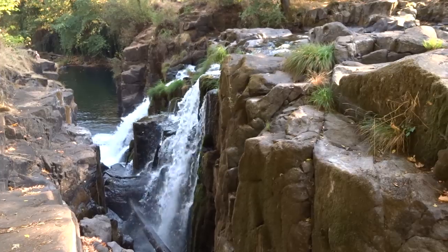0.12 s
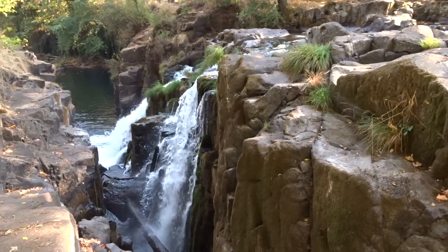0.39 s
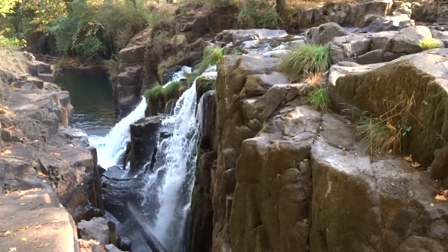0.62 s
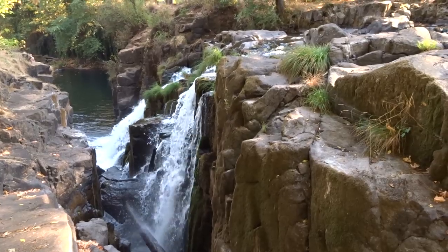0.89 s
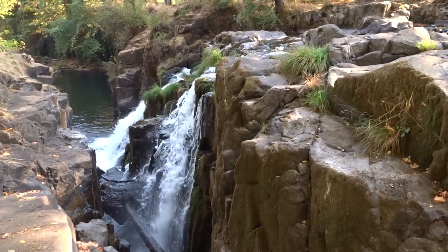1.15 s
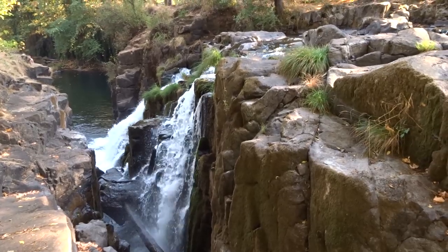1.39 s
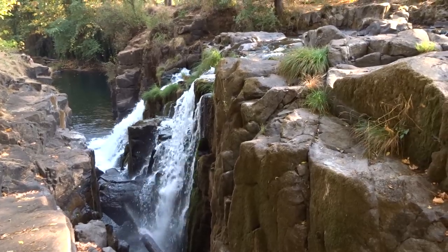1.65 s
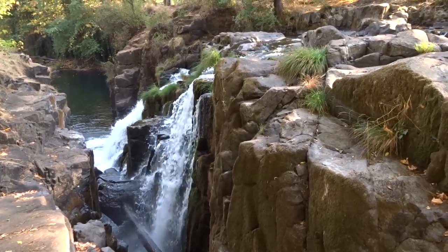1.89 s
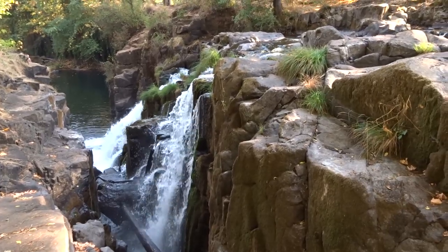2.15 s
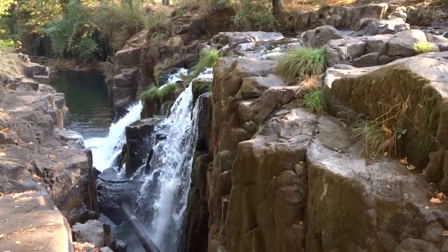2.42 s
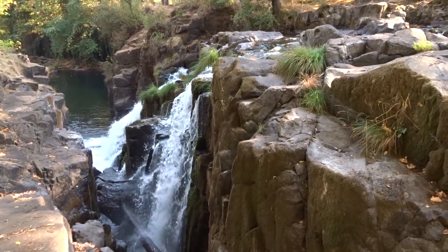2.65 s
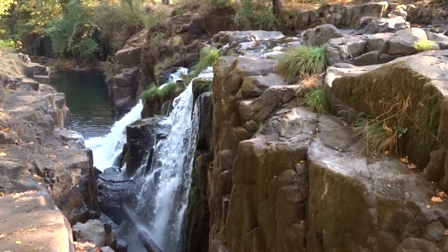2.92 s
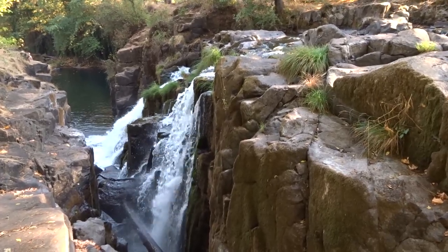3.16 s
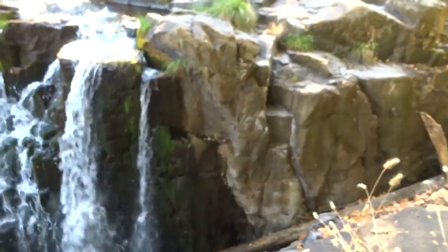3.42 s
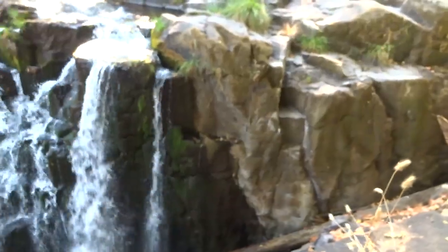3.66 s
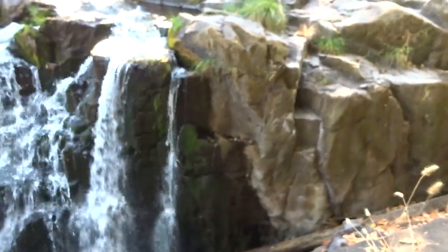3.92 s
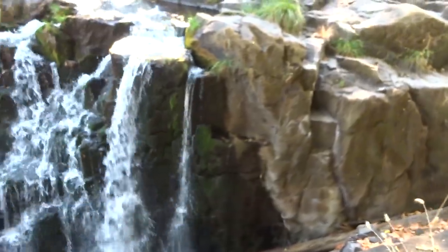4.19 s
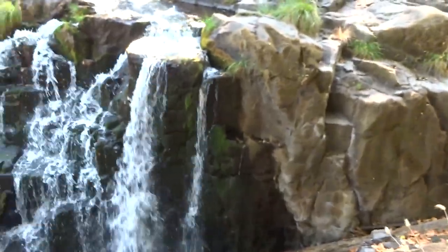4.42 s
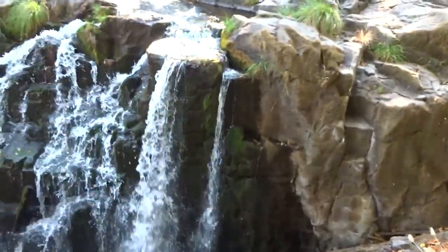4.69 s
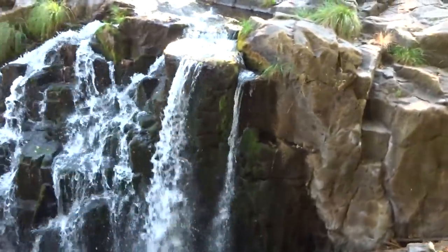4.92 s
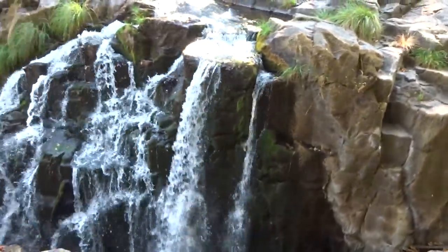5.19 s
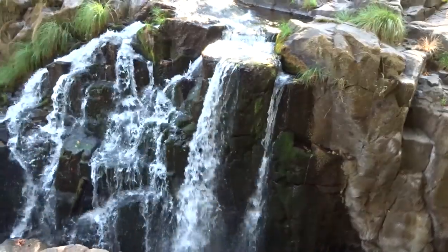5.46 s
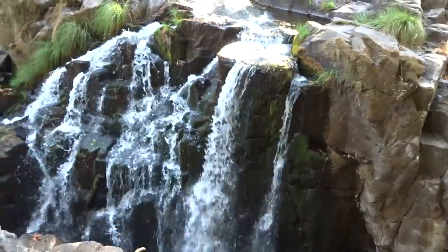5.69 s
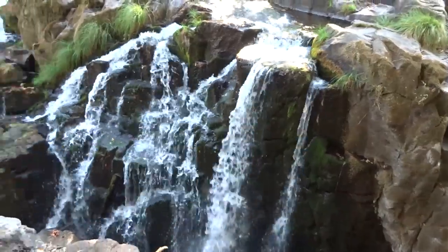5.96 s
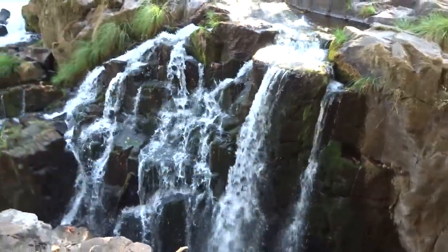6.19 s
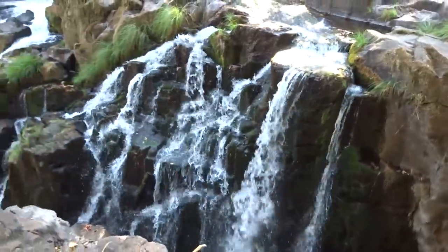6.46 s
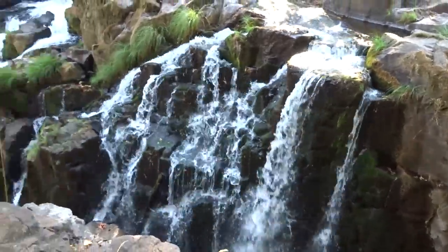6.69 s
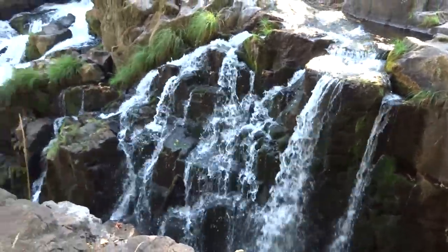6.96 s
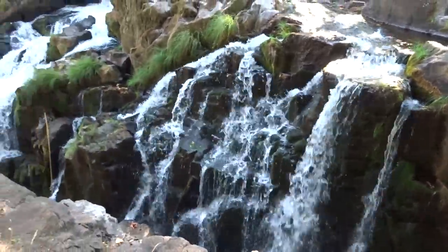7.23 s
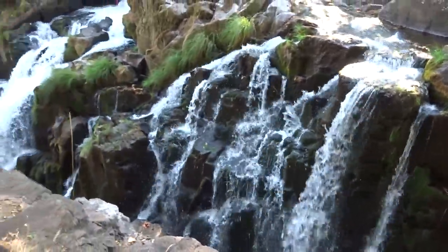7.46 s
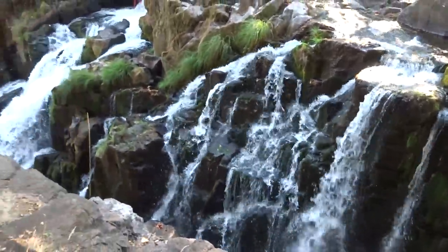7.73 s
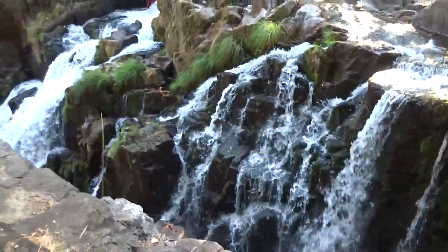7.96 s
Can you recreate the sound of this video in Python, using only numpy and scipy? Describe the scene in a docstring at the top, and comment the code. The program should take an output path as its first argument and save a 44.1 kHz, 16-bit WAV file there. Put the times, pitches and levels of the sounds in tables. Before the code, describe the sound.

A loud, dense, steady waterfall rush over rock with faint low wind rumble, briefly cut near three seconds, then fading back in slightly changed.

```python
"""A rocky gorge with a waterfall, heard from above the fall and then facing it. Countless drops merge into one
broad rush: dense random impacts, filtered by water and rock, swelling in bands. A light breeze rumbles on the
two microphone ports: low-passing gusts of lumpy low noise. At the change of standpoint the sound is cut off,
then fades in again; the image is wide, and narrows as the microphone turns along the fall. Now and then a
treble band flares wide for an instant."""
import sys
import numpy as np
from scipy import signal
from scipy.fft import rfft, irfft
from scipy.io import wavfile

SR = 44100
rng = np.random.default_rng(int(sys.argv[2]) if len(sys.argv) > 2 else 0)


def digitize_waveform(pressure):
    """Quantize a signal to 16-bit integers and store it at the path in sys.argv[1].

    Rows of a 2-D input are taken as channels; values are limited to [-1, 1].
    """
    field = np.atleast_2d(pressure).T
    bounded = np.clip(field, -1, 1)
    quanta = np.round(bounded * 32767).astype(np.int16)
    wavfile.write(sys.argv[1], SR, quanta)


def volts_from_db(level):
    """Convert decibel levels to linear amplitude ratios."""
    exponent = np.asarray(level, float) / 20
    return 10 ** exponent


N = 357210
TIME_S = np.arange(N) / SR
HZ = np.maximum(np.fft.rfftfreq(N, 1 / SR), 1)   # kept off zero for the log axis

FACING_START_S = 3.2853                  # the second standpoint begins here
TURN_START_S, TURN_END_S = 3, 5.5        # the microphone turns along the fall
ABOVE = TIME_S < FACING_START_S          # true while we stand above the fall


def rms_one(x):
    """Scale to unit rms."""
    return x / np.sqrt(np.mean(x ** 2) + 1e-20)


def curve_db(points):
    """Read a (Hz, dB) curve at every frequency bin, on a log-frequency axis."""
    hz, db = np.transpose(points)
    return np.interp(np.log(HZ), np.log(hz), db)


def coloured(source, spectrum_db):
    """Filter a source by a dB value per frequency bin."""
    return irfft(rfft(source) * volts_from_db(spectrum_db), N)


def drift(rate_hz):
    """Slow chance: noise at every 40th sample, low-passed twice at rate_hz, with spread 1."""
    pole = np.exp(-80 * np.pi * rate_hz / SR)
    noise = rng.standard_normal(N // 40 + 4002)
    slow = signal.lfilter([1], [1, -2 * pole, pole * pole], noise)[4000:]   # skip the filter's start
    return np.interp(np.arange(N) / 40, np.arange(len(slow)), rms_one(slow - slow.mean()))


def by_standpoint(above, facing, turned):
    """One value above the fall; facing it, a value that slides to another as the microphone turns."""
    return np.where(ABOVE, above, np.interp(TIME_S, [TURN_START_S, TURN_END_S], [facing, turned]))


def breeze():
    """Turbulence at each port: lumpy low noise, mostly its own per channel, its deepest part cut by the mic."""
    # Gusts on the ports. Each row: start in seconds, length in seconds, level in dB before the lumps.
    gusts = [(0, .36, -42.5), (.7, .25, -49), (1.1, 0.58, -52), (1.718, .9, -46), (2.616, 0.7, -43),
             (4.79, .12, -53), (6.27, .2, -52), (6.7, 0.4, -58), (7.36, .16, -46)]
    edge_s, calm_db, lump_db = .04, -80, 6   # swell and decay time, air between gusts, spread of the lumps
    band = signal.butter(2, [87, 345], "band", fs=SR, output="sos")
    bass_cut = signal.butter(2, 110, "high", fs=SR, output="sos")
    noise = rng.standard_normal((2, N)) + .5 * rng.standard_normal(N)   # own part plus common part
    eddies = rms_one(signal.sosfilt(np.vstack([band, bass_cut]), noise))
    wind = np.full(N, volts_from_db(calm_db))
    for start_s, length_s, db in gusts:
        inside_s = np.minimum(TIME_S - start_s, start_s + length_s - TIME_S)
        wind += volts_from_db(db) * np.clip(inside_s / edge_s + .5, 0, 1)
    lumps_db = lump_db * np.array([drift(24), drift(14)])
    return eddies * wind * volts_from_db(lumps_db)


def impacts(size_spread_db, clump_db):
    """A drop lands at every instant; sizes vary, and heavier sheets of water arrive in clumps."""
    sizes_db = size_spread_db * np.minimum(rng.exponential(1, N), 5) + clump_db * drift(67)
    return rng.standard_normal(N) * volts_from_db(sizes_db)


def falling_water():
    """Impacts coloured by water and rock: the sound both ports share, and what differs between them."""
    # Falling water as the microphone hears it, thin in the bass.
    # Each row: frequency in Hz, relative spectral density in dB.
    water = [(15, -45), (30, -32), (60, -22.5), (150, -13), (300, -3.5), (600, 0.5), (5000, -1), (7900, -2),
             (8800, -4), (12500, -4.5), (14200, -6.5), (15500, -9.5)]
    # Rock faces and the ledge underfoot colour the low and middle rush, from above the fall and facing it.
    # Each row: frequency in Hz, gain in dB.
    rock_above = [(30, 2), (100, 1.5), (200, 2), (310, 3), (400, -2.5), (470, -7), (620, 0.5), (880, 1.5),
                  (1000, -0.5), (1400, -1), (1700, -1), (2100, -1.5), (3600, 1), (6200, -1)]
    rock_facing = [(60, -3.5), (100, -4), (150, -1), (230, 1.5), (340, 2), (450, -1.5), (540, -0.5),
                   (720, 2), (1000, 1), (1200, 2), (1500, -0.5), (1850, 1.5), (3600, -1), (6200, 0)]
    # Change of colour once the microphone has turned along the fall. Each row: frequency in Hz, gain in dB.
    turned = [(100, -1.5), (250, -0.5), (450, -3.5), (700, -1.5), (1200, -1), (2000, -2), (3500, 1.5),
              (6000, -0.5), (10000, -1)]
    # Colour of the difference between the ports, at each standpoint, before the image is widened or narrowed.
    # Each row: frequency in Hz, gain in dB on top of the shared colour.
    difference_above = [(100, -30), (400, -21), (700, -24), (1300, -18.5), (2500, -27), (3400, -34),
                        (5000, -19.5), (9000, -30.5), (15000, -67)]
    difference_facing = [(100, -57), (400, -18), (700, -21.5), (1300, -12.5), (2500, -22), (3400, -20.5),
                         (5000, -14.5), (9000, -30), (15000, -60)]

    above_db = curve_db(water) + curve_db(rock_above)
    facing_db = curve_db(water) + curve_db(rock_facing)
    common_drops = impacts(size_spread_db=1.0, clump_db=0.18)
    separate_drops = impacts(size_spread_db=1.0, clump_db=0.2)

    turn = np.interp(TIME_S, [TURN_START_S, TURN_END_S], [0, 1])
    facing = (1 - turn) * coloured(common_drops, facing_db)
    facing += turn * coloured(common_drops, facing_db + curve_db(turned))
    shared = np.where(ABOVE, coloured(common_drops, above_db), facing)
    apart = np.where(ABOVE,
                     coloured(separate_drops, above_db + curve_db(difference_above)),
                     coloured(separate_drops, facing_db + curve_db(difference_facing)))
    # unit level at each standpoint
    scale = np.where(ABOVE, np.std(shared[ABOVE]), np.std(shared[~ABOVE]))
    return shared / scale, apart / scale


def rush(widen_db, surge_db, own_db, patch_db):
    """The falling water in bands that swell partly together, partly alone, and open wide now and then."""
    thump_db, thump_below_hz = 1.5, 160    # extra spread: the plunge pool thumps unevenly in the deep bass
    flare_db, flare_rarity = 0, 2.15       # level against the shared sound; threshold in spreads of the drift
    shared, apart = [rfft(part) for part in falling_water()]
    surge, flicker = drift(14), drift(25)
    edges = np.r_[1, np.geomspace(40, 3000, 8), np.linspace(4000, 16000, 13), SR / 2]
    out = np.zeros((2, N))
    for k, centre in enumerate(edges[1:-1]):
        share = np.interp(HZ, edges[k:k + 3], [0, 1, 0])   # overlapping triangles that add up to one
        mid, side = irfft(shared * share, N), irfft(apart * share, N)

        # the fine spray surges as one, the deep roar does not
        spray = np.clip(0.37 + 0.13 * np.log2(centre / 3000), 0, 1)
        alone_db = own_db + thump_db * (centre < thump_below_hz)
        gain = volts_from_db(surge_db * spray * surge + alone_db * drift(10))

        # the image opens in brief patches, most in the treble
        opening = np.clip(rms_one(drift(29) + 0.94 * flicker) - .8, 0, 1.6)
        side_gain = volts_from_db(widen_db + patch_db * spray * opening)

        # a treble band flares wide for an instant
        flare = (centre > 3500) * np.clip(4 * (drift(15) - flare_rarity), 0, 1)
        side_gain = side_gain + flare * volts_from_db(flare_db) * np.std(mid) / np.std(side)
        side = side * side_gain
        out += gain * np.array([mid + side, mid - side])
    return out


def change_of_standpoint():
    """Full level up to the cut, a stub that ramps down, then a fade-in that rises fast and then creeps."""
    cut_s, stub_db = 3.2746, -14.5
    fast_s, slow_s, slow_share = .065, .22, .3   # time constants of the fade-in, share of the slow one (0-1)
    ramp = np.clip((FACING_START_S - TIME_S) / (FACING_START_S - cut_s), .05, 1)
    stub = volts_from_db(stub_db) * ramp
    since_s = np.maximum(TIME_S - FACING_START_S, 0)
    fade_in = 1 - slow_share * np.exp(-since_s / slow_s) - (1 - slow_share) * np.exp(-since_s / fast_s)
    after_cut = np.where(ABOVE, stub, np.maximum(fade_in, .01))
    return np.where(TIME_S < cut_s, 1, after_cut)


def scene():
    """The fall from above, then from the front, with the breeze."""
    rush_db = by_standpoint(above=-15.5, facing=-16.4, turned=-15)
    # the image is widest facing the fall and narrows as the microphone turns
    widen_db = by_standpoint(above=-4.5, facing=-.6, turned=-8)
    fall = volts_from_db(rush_db) * rush(widen_db, surge_db=0.85, own_db=0.45, patch_db=19.0)
    return (fall + breeze()) * change_of_standpoint()


def low_pass(x):
    """Removes everything above the highest recorded frequency."""
    return signal.sosfilt(signal.butter(12, 15540, fs=SR, output="sos"), x)


def record(dry):
    """The input stage saturates softly and rounds the highest peaks."""
    headroom = 1.26   # saturation level, full scale = 1
    mix = headroom * np.tanh(dry / headroom)
    return low_pass(mix)


dry = scene()
out = record(dry)
digitize_waveform(out)
```